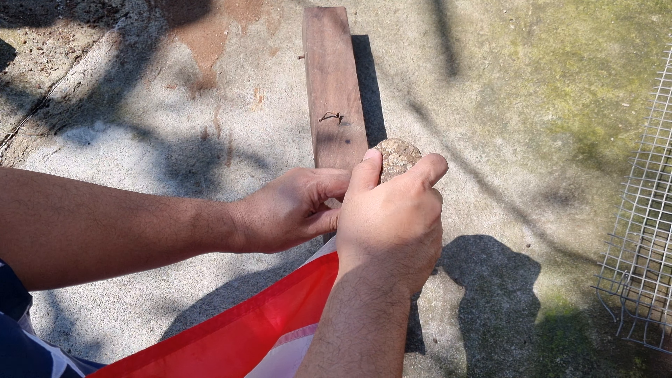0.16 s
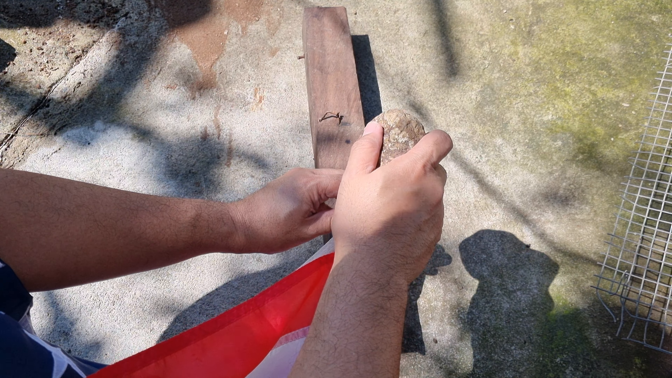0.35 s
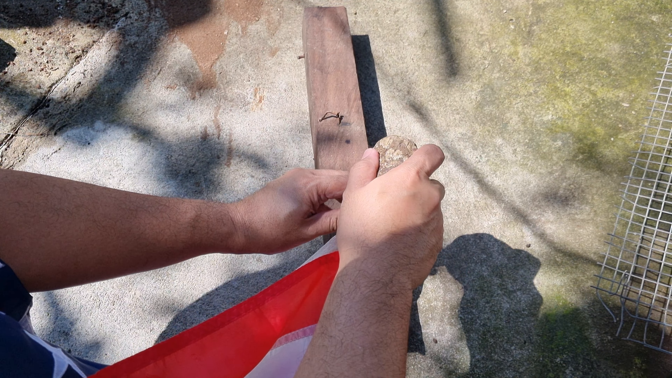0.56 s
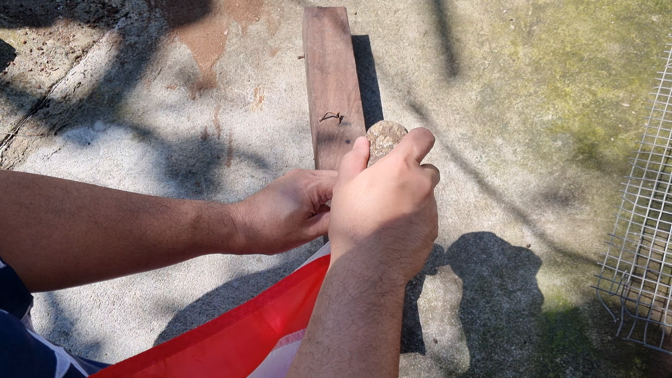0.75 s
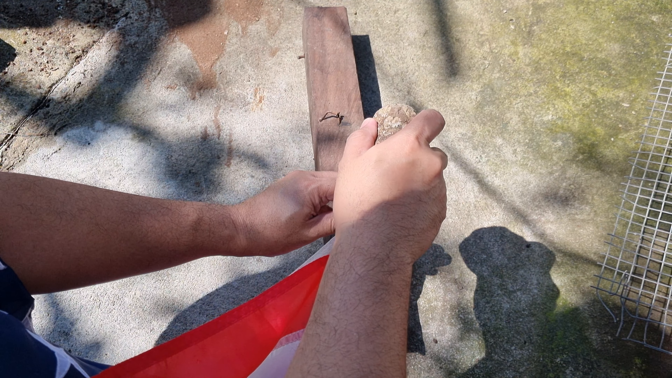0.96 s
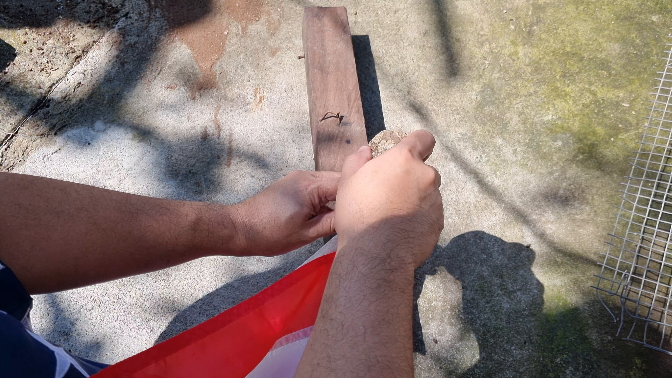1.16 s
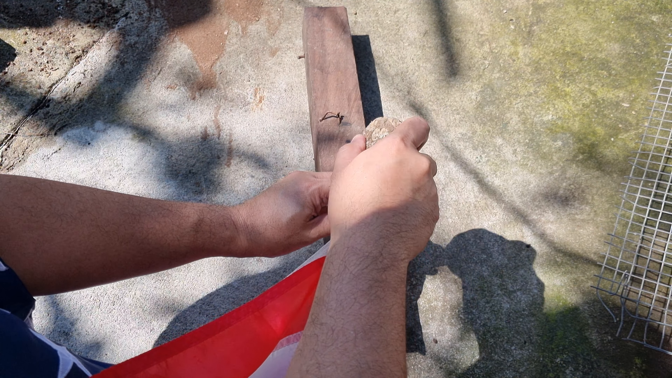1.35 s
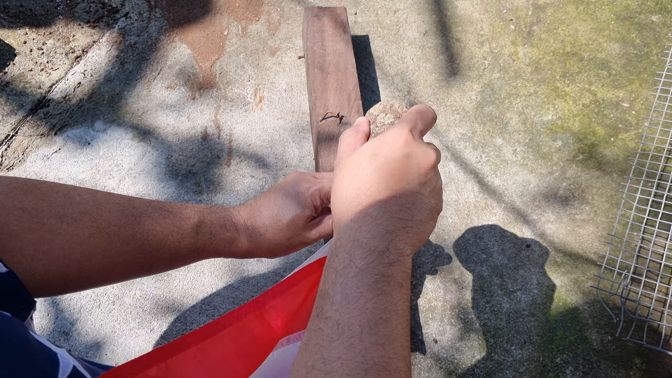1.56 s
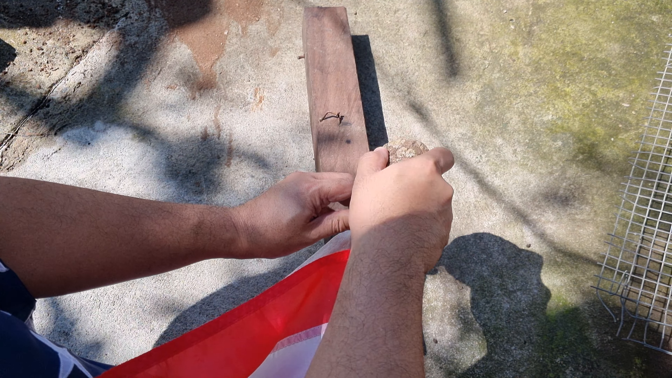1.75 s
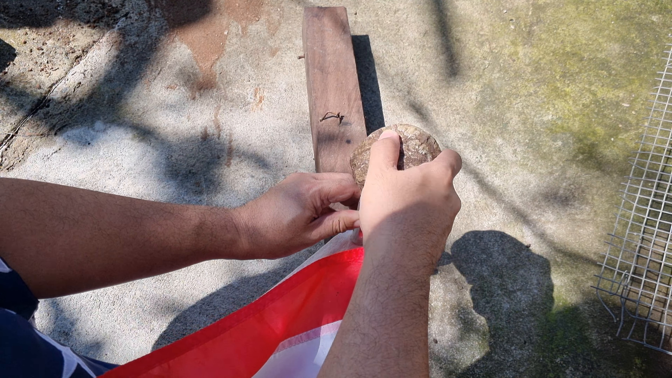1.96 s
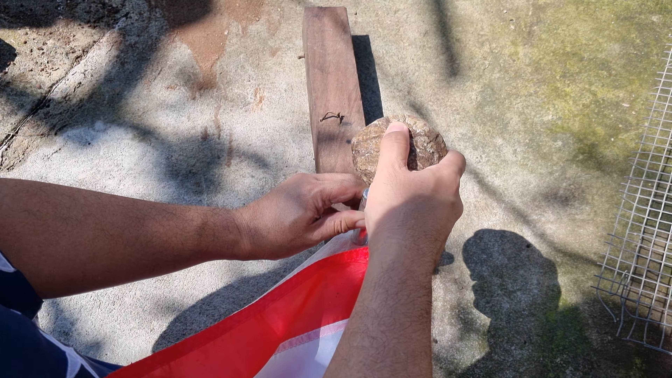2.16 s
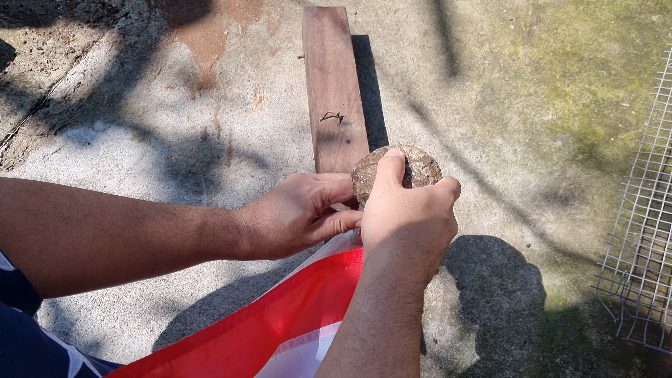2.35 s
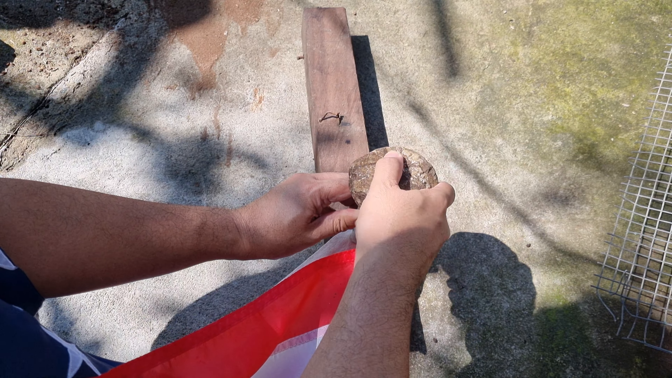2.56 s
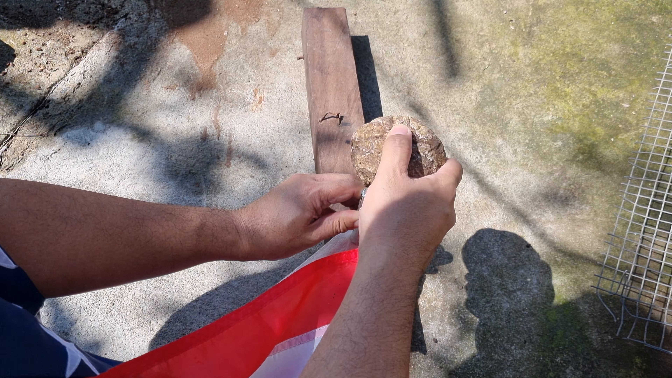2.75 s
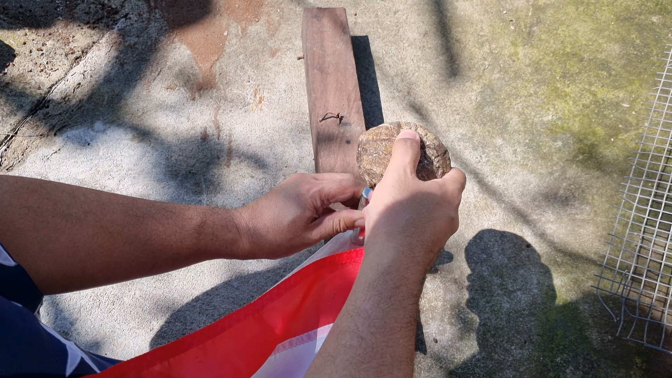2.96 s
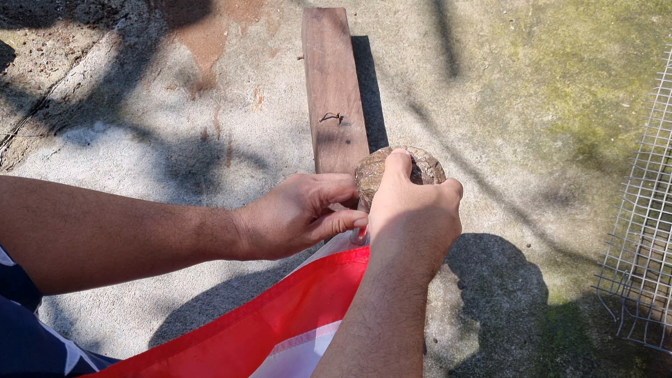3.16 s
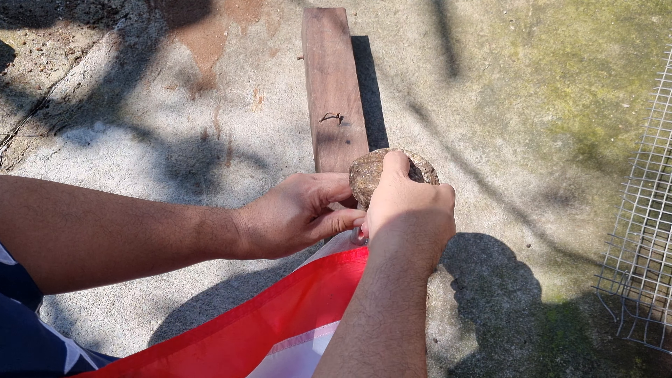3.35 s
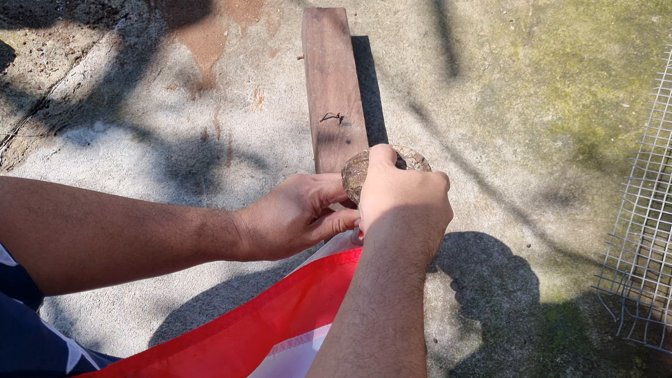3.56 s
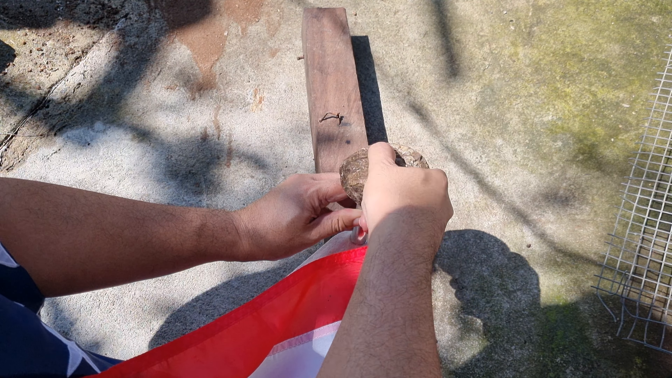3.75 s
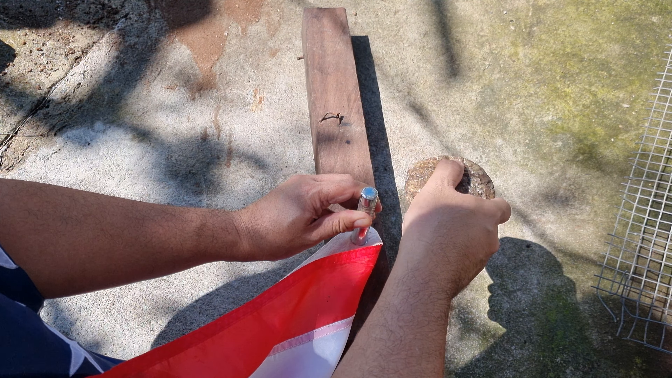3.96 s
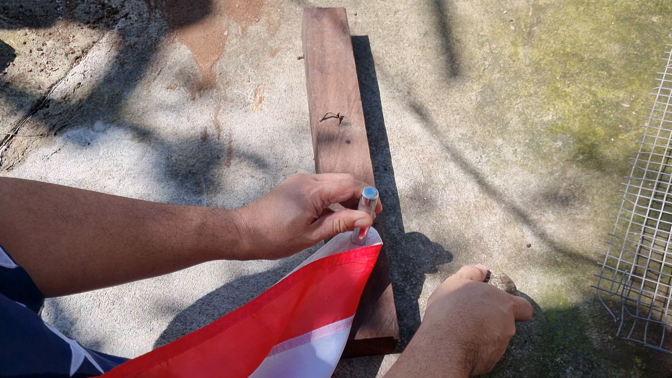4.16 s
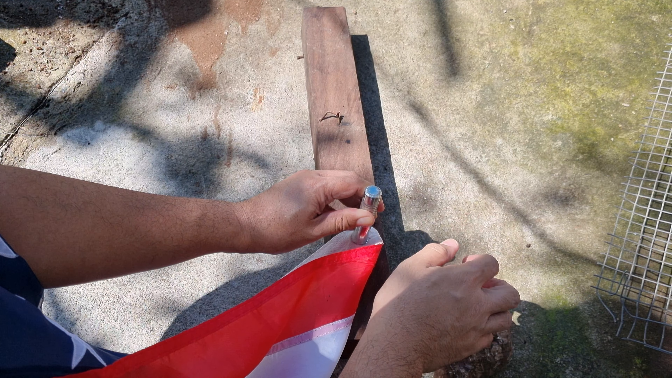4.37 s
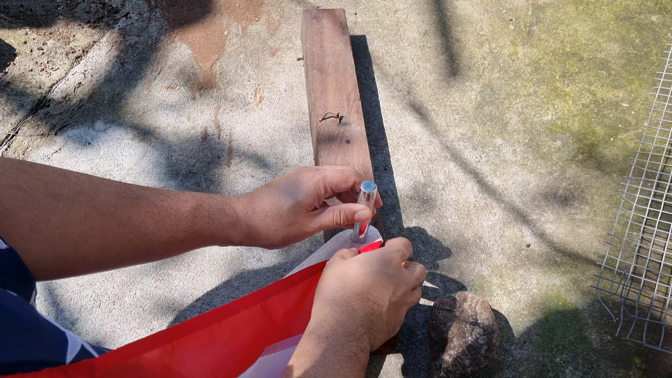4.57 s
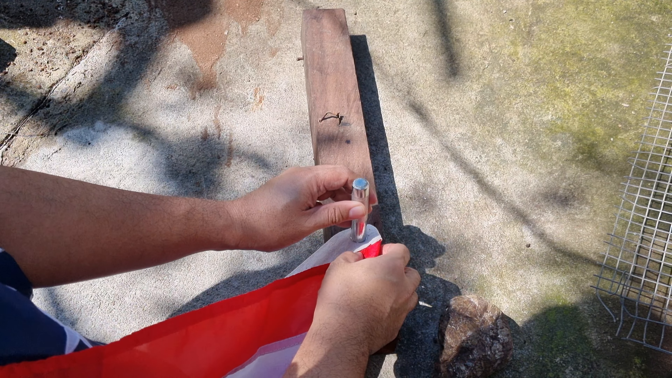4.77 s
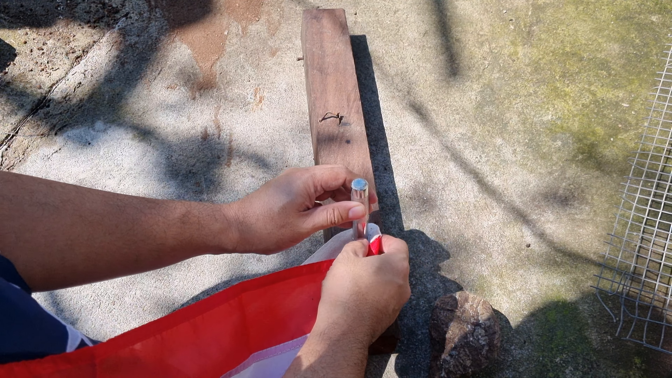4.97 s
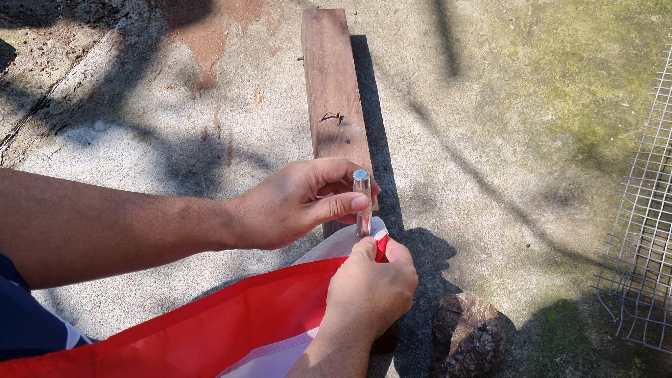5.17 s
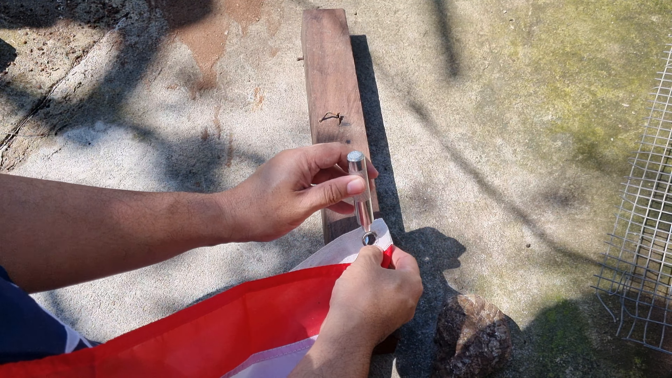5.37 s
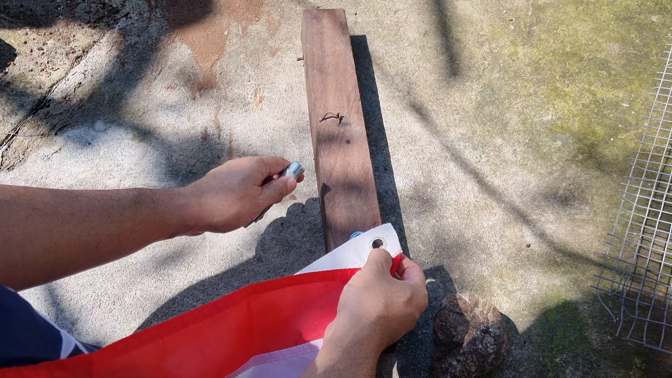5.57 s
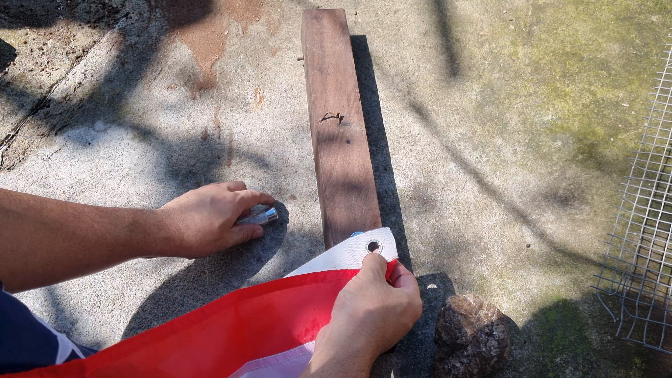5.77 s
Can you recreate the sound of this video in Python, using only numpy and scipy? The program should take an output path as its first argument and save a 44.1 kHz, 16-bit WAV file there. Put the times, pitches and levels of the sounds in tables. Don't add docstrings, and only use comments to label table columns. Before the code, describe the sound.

A hand-held stone strikes a steel punch in fourteen sharp, ringing clinks over a wooden thump, then tools are set down on concrete.

```python
import sys
import numpy as np
from scipy import signal
from scipy.io import wavfile

SR = 44100
rng = np.random.default_rng(int(sys.argv[2]) if len(sys.argv) > 2 else 0)


def undo_db(level):
    steps = np.asarray(level, float) / 20
    return 10 ** steps


def generate_wav(signal):
    frames = np.transpose(np.atleast_2d(signal))
    scaled = np.clip(frames, -1, 1) * 32767
    pcm = np.round(scaled).astype(np.int16)
    wavfile.write(sys.argv[1], SR, pcm)


N = 256566


def at_hz(points, hz, column=1):
    points = np.array(points)
    return np.interp(np.log(hz), np.log(points[:, 0]), points[:, column])


def rms_one(x):
    return x / np.sqrt(np.mean(x ** 2) + 1e-20)


def band_pass(x, low_hz, high_hz, order):
    return signal.sosfilt(signal.butter(order, [low_hz, high_hz], "band", fs=SR, output="sos"), x)


def high_pass(x, hz, order):
    return signal.sosfilt(signal.butter(order, hz, "high", fs=SR, output="sos"), x)


def low_pass(x, hz, order):
    return signal.sosfilt(signal.butter(order, hz, fs=SR, output="sos"), x)


def bands(size, gain_of_band, likeness):
    out = 0
    edges = 25 * 2 ** np.arange(0, 9.5, .4)
    white = rng.standard_normal((2, 2, size))
    for k, (low, high) in enumerate(zip(edges, edges[1:])):
        mid, side = band_pass(white[k % 2], low, high, order=3)
        hz = np.sqrt(low * high)
        alike = np.clip(at_hz(likeness, hz), 0, 1)
        stereo = np.sqrt(1 + alike) * mid + np.sqrt(1 - alike) * side * [[1], [-1]]
        out = out + gain_of_band(hz) * stereo
    return out


def narrow(hz, width_hz):
    r = np.exp(-np.pi * width_hz / SR)
    slow = signal.lfilter([1], [1, -r], rng.standard_normal(N) + 1j * rng.standard_normal(N))
    turns = np.cumsum(hz + np.zeros(N)) / SR
    return rms_one(np.real((2.6 + slow / np.std(slow)) * np.exp(2j * np.pi * turns)))


def modes(table, push_s, spread_db, apart=0., length_s=.2):
    t = np.arange(int(length_s * SR)) / SR
    hz, db, t60 = np.transpose(table)[:, :, None]
    strength, detune, phase = rng.standard_normal((3, len(table), 1))
    uneven_db = np.clip(spread_db, 0, 3.5) * np.clip(strength, -1.5, 1.5)
    decay = undo_db(db + uneven_db - 60 * np.maximum(t - push_s, 0) / t60)
    angle = 2 * np.pi * hz * (1 + 0.0042 * detune) * t
    ears = [decay * np.sin(angle + side * apart * phase) for side in (1, -1)]
    swell = np.sin(np.pi / 2 * np.minimum(t / push_s, 1)) ** 1.6
    return np.sum(ears, axis=1) * swell


def burst(low_hz, high_hz, t60, apart=0.8, length_s=0.1):
    t = np.arange(int(length_s * SR)) / SR
    mid, side = band_pass(rng.standard_normal((2, len(t))), low_hz, high_hz, order=4)
    return 0.51 * rms_one(mid + apart * side * [[1], [-1]]) * undo_db(-60 * t / t60)


def add(track, s, sound, pan_db=0.):
    at = round(s * SR)
    part = sound[:, :N - at]
    track[:, at:at + part.shape[1]] += undo_db(np.array([[pan_db / 2], [-pan_db / 2]])) * part


# (time [s], level [dB])
TRAFFIC_LEVEL = [
    (0, -38.5),
    (.7, -40.5),
    (2.2, -46),
    (3, -49.5),
    (4.1, -48.5),
    (4.95, -44.5),
    (5.4, -46),
    (5.65, -41),
    (5.82, -39),
]
# (frequency [Hz], level [dB per Hz])
TRAFFIC_RUMBLE = [(30, -26), (42, 6), (60, -7), (82, -16.5), (115, 1), (160, -5), (230, -8.5), (330, -16),
                  (460, -28), (620, -27.5), (800, -39), (1000, -52.5)]
# (frequency [Hz], level [dB per Hz])
TRAFFIC_HISS = [(700, -11), (1000, -6), (1700, -7), (3100, -11.5), (3700, -26), (5000, -40), (7000, -64),
                (16000, -81.5)]
# (frequency [Hz], level [dB per Hz])
MICROPHONE_NOISE = [(3000, -116), (7800, -118), (8700, -100), (11000, -106), (16000, -103)]
# (frequency [Hz], likeness [0 to 1])
TRAFFIC_LIKENESS = [(30, 1), (300, 0.69), (1000, 0.4), (4000, 0.1), (15000, .05)]


def traffic():
    s, db = np.transpose(TRAFFIC_LEVEL)
    rumble_db = np.interp(np.arange(N) / SR, s, db)
    hiss_db = -2 + 1.595 * rumble_db

    def gain(hz):
        if hz < 950:
            return undo_db(at_hz(TRAFFIC_RUMBLE, hz) + rumble_db + 19.5)
        hiss = undo_db(at_hz(TRAFFIC_HISS, hz) + hiss_db + 10.5)
        return hiss + undo_db(at_hz(MICROPHONE_NOISE, hz) + 1.0)
    return high_pass(bands(N, gain, TRAFFIC_LIKENESS), 36, order=6)


# (frequency [Hz], width [Hz], level [dB])
MACHINE_TONES = [(57, 1, -49), (116.7, 1.7, -54), (166.6, 8, -55.5), (551, 14, -73)]


def machine_hum():
    return sum(undo_db(db) * narrow(hz, width_hz) for hz, width_hz, db in MACHINE_TONES)


def whine_line(s, first_hz, last_hz, peak_db, steady_db):
    glide_s, swell_s, settle_s = .45, 0.066, 0.17
    gone_s, fade_db_per_s, overtone_db = 1.2, 68, -7.5
    t = np.arange(N) / SR
    since = t - s
    after = np.maximum(since, 0)
    level_db = steady_db + (peak_db - steady_db) * np.exp(-after / settle_s)
    level_db = level_db - fade_db_per_s * np.maximum(t - gone_s, 0)
    swell = np.clip(1 + since / swell_s, 0, 1) ** 2
    hz = last_hz + (first_hz - last_hz) * np.exp(-after / glide_s)
    tone = narrow(hz, width_hz=25) + undo_db(overtone_db) * narrow(2 * hz, width_hz=45)
    return swell * undo_db(level_db) * tone


# (time of swell [s], first pitch [Hz], last pitch [Hz], peak [dB], steady level [dB])
WHINE_LINES = [
    (.08, 1655, 1490, -65.5, -77.5),
    (.44, 1158, 1068, -67.5, -82.5),
]


def passing_whine():
    return sum(whine_line(*row) for row in WHINE_LINES)


# (frequency [Hz], level [dB], time to fall 60 dB [s])
YARD_TAIL = [(100, -15, .25), (586, -15.5, .18), (1890, -20, 0.15), (2500, -22.5, 0.24), (3040, -13, 0.18),
             (4900, -7.5, 0.16), (9500, -7, 0.13), (14980, -9.5, 0.073)]
# (frequency [Hz], likeness [0 to 1])
YARD_TAIL_LIKENESS = [(100, 0.89), (400, .9), (700, 0.24), (1900, .3), (4000, 0.069), (15000, .02)]
# (delay [s], level [dB])
WALL_ECHOES = [
    (0.019, -15.5),
    (.052, -27.5),
    (0.068, -36),
    (0.121, -47),
]


def yard(x):
    t = np.arange(int(.35 * SR)) / SR

    def gain(hz):
        return undo_db(at_hz(YARD_TAIL, hz) - 60 * t / at_hz(YARD_TAIL, hz, column=2))
    tail = bands(len(t), gain, YARD_TAIL_LIKENESS)
    tail *= 0.046 * np.minimum(t / 0.0017, 1)
    for delay_s, db in WALL_ECHOES:
        for ear, later_s in zip(tail, rng.uniform(0, 0.0005, 2)):
            ear[int((delay_s + later_s) * SR)] += undo_db(db - 4.5)
    return signal.fftconvolve(x, tail, axes=1)[:, :N]


# (time [s], peak [dB], dying away [dB per s])
CLOTH_PULLS = [
    (4.335, -70, 470),
    (5.22, -58, 700),
    (5.555, -69, 600),
    (5.83, -77, 502),
]


def cloth():
    t = np.arange(N) / SR
    level = 0
    for s, db, fall_db_per_s in CLOTH_PULLS:
        level = level + undo_db(db - np.where(t < s, 1100 * (s - t), fall_db_per_s * (t - s)))
    jerks = np.repeat(rng.exponential(1, N // 40 + 1), 40)[:N] ** 0.84
    grit = rng.standard_normal((2, N)) * jerks
    low = band_pass(grit, 5800, 7300, order=2)
    high = band_pass(grit, 8800, 16000, order=2)
    return level * rms_one(low + .3 * high)


# (time [s], level [dB], time to fall 60 dB [s])
PUNCH_NUDGES = [
    (4.4213, -43, 0.027),
    (4.649, -46.5, 0.089),
    (4.7455, -47, 0.065),
    (4.761, -48, 0.063),
    (4.771, -49.5, 0.11),
    (4.9873, -27, 0.053),
    (5.1148, -48.5, 0.094),
    (5.149, -50.5, .08),
]


def punch_nudges(track):
    for s, db, t60 in PUNCH_NUDGES:
        ring = [(1846, -1, t60), (1815, -34.0, t60 * 0.55), (2030, -8, t60 * 0.59), (2980, -17.0, t60 * 0.25)]
        add(track, s, undo_db(db - 5.5) * modes(ring, push_s=0.0025, spread_db=0, apart=0.12), pan_db=2.5)


# (time [s], dull level [dB], hard edge [dB], time to fall 60 dB [s])
TOUCHDOWNS = [(4.2139, -18.5, -58, 0.037), (4.245, -41.5, -64, 0.043), (4.324, -25.5, -48.5, 0.037),
              (4.347, -43, -61, 0.14), (4.507, -56.5, -83.5, 0.042), (4.561, -41, -65, 0.064),
              (4.585, -42, -69, 0.024), (4.657, -43, -72, 0.085), (4.669, -64, -61, 0.036),
              (4.761, -54, -61, 0.1), (4.819, -41, -64, 0.048), (4.881, -46.5, -61, 0.053),
              (4.9873, -46.5, -58, 0.078), (5.118, -46, -71, 0.052), (5.549, -48.5, -57, 0.13),
              (5.69, -54, -63, 0.15), (5.7977, -24.5, -48.5, 0.027), (5.808, -27, -53, 0.058)]


def touchdowns(track):
    for s, dull_db, edge_db, t60 in TOUCHDOWNS:
        body = undo_db(dull_db - 2.5) * burst(130, 525, t60 * 2.0, apart=0.047)
        body = body + undo_db(dull_db - 1.0) * burst(500, 1600, t60 * 0.55)
        edge = undo_db(edge_db - 4.0) * burst(740, 3400, t60 * 2.0)
        bright = undo_db(edge_db - 21) * burst(9100, 10500, t60 * 1.4, apart=0.6)
        tick = undo_db(edge_db + 7.5) * burst(600, 3300, .011, apart=.2)
        add(track, s, body + edge + bright + tick, pan_db=3.0)


# (time [s], frequency [Hz], level [dB], time to fall 60 dB [s])
PUNCH_LANDINGS = [
    (4.3246, 9150, -56.5, 0.02),
    (5.8011, 9680, -41, 0.45),
]


def punch_landings(track):
    for s, hz, db, t60 in PUNCH_LANDINGS:
        add(track, s, modes([(hz, db, t60)], push_s=.0012, spread_db=0), pan_db=7.0)


def handling():
    out = np.zeros((2, N))
    punch_nudges(out)
    touchdowns(out)
    punch_landings(out)
    return out


# (frequency [Hz], level [dB], time to fall 60 dB [s])
PLANK_LOW_TONES = [(73, -12.5, 0.033), (133.4, -4.5, 0.19), (186, -12.5, 0.15)]
# (frequency [Hz], level [dB], time to fall 60 dB [s])
PLANK_HIGH_TONES = [(260.6, -0.5, 0.062), (322, -3.5, .045), (432.5, -8, .04)]


def plank_thump(track, s, thump_db):
    low = modes(PLANK_LOW_TONES, push_s=0.012, spread_db=1.5, apart=.08)
    high = modes(PLANK_HIGH_TONES, push_s=0.019, spread_db=3.5, apart=0.16)
    add(track, s + 0.00033, undo_db(thump_db - 2.0) * low)
    add(track, s + 0.00051, undo_db(0.66 * thump_db - 15.5) * high)
    add(track, s + 0.0034, undo_db(0.37 * thump_db - 17.5) * burst(200, 890, 0.08, apart=0.23))


# (frequency [Hz], level [dB], time to fall 60 dB [s])
STONE_TONES = [(586, -9.5, 0.041), (754, -9.5, 0.0085), (845, -5, 0.015), (1168, -2.5, 0.0035),
               (1362, 1, 0.0076), (2155, -2.5, 0.013), (2727, -3.5, .006), (2950, -9, .005)]


def stone_knock(track, s, knock_db, bottom_s):
    knock = modes(STONE_TONES, 0.52 * bottom_s, spread_db=1.5, apart=0.76)
    add(track, s, undo_db(knock_db + 5.0) * knock, pan_db=3.45)
    add(track, s, undo_db(knock_db - 13.0) * burst(610, 2900, 0.17, apart=0.15))


# (frequency [Hz], level [dB], time to fall 60 dB [s])
PUNCH_UPPER_TONES = [(3086, -11.5, 0.078), (3203, -10, 0.044), (3410, -14, 0.018), (3740, -18.5, 0.02),
                     (4370, -18.5, 0.059), (4390, -13.5, 0.061), (4520, -12.5, 0.023), (5740, -18, .03)]


def steel_crack(track, s, upper_db, bottom_s):
    crack_db = upper_db - 12.5 + 7 * np.exp(-abs(s - .5) / .45)
    top_wear_db = 1.5 * s
    tick = np.sin(2 * np.pi * np.arange(22) / 22) * np.linspace(1, .5, 22) * [[1], [1]]
    upper = modes(PUNCH_UPPER_TONES, 0.84 * bottom_s, spread_db=3.5, apart=.5)
    add(track, s, undo_db(0.78 * crack_db + 17.0) * tick)
    add(track, s, undo_db(upper_db + 2.0) * upper, pan_db=-1.5)
    add(track, s, undo_db(upper_db + 7.5) * burst(3500, 5200, 0.011, apart=.7), pan_db=-0.5)
    add(track, s, undo_db(crack_db + 5.5) * burst(4500, 7200, 0.013, apart=.6))
    add(track, s, undo_db(crack_db + 7.0) * burst(8500, 11200, .022, apart=1.2), pan_db=1.0)
    add(track, s, undo_db(crack_db - 1.0 - top_wear_db) * burst(12000, 15000, 0.041, apart=0.97))


# (frequency [Hz], level [dB], time to fall 60 dB [s])
PUNCH_TONES = [(1866.4, 1, 0.089), (1802, -13.5, .12), (1951, -14, 0.12), (2080, -14, 0.1),
               (1723, -28.5, 0.075)]
# (frequency [Hz], level [dB], time to fall 60 dB [s])
PUNCH_LINGERING = [(1842, -37.5, 0.2), (3166, -44.5, .2), (3050, -46, 0.23)]


def punch_ring(track, s, ring_db, bottom_s):
    grip_s, grip_db = .013, -11
    t = np.arange(int(.2 * SR)) / SR
    grip = undo_db(grip_db / (1 + np.exp(-(t - grip_s) / .001)))
    ring = grip * modes(PUNCH_TONES, bottom_s, spread_db=2.47, apart=0.076)
    linger = modes(PUNCH_LINGERING, bottom_s, spread_db=1.0, apart=0.9, length_s=.3)
    click = modes([(2150, 0.0031, 0.0056)], push_s=0.00073, spread_db=3.5)
    add(track, s + .0004, undo_db(ring_db - 7.0) * ring, pan_db=-0.45)
    add(track, s, undo_db(ring_db) * linger)
    add(track, s + bottom_s - .0009, undo_db(ring_db - 3.5) * click)


# (time [s], ring [dB], thump into the plank [dB], sharpness of steel contact [dB])
STONE_BLOWS = [(0.1487, -17.5, -41, -53), (0.4915, 0.5, -22, -20), (0.791, -1.5, -16, -18),
               (1.0944, -3.5, -18, -22), (1.3818, -14, -11.5, -37.5), (1.6845, -2.5, -15.5, -21.5),
               (1.9846, -1, -21.5, -19), (2.2625, -0.5, -22, -21), (2.535, 0.5, -21, -19.5),
               (2.7977, -0.5, -22, -20), (3.0707, -1, -22.5, -20), (3.3171, 0.5, -22.5, -22.5),
               (3.5564, 0, -26, -22.5), (3.7392, -2.5, -24, -24.5)]


def blows():
    first_bottom_s, packed_bottom_s, packing_s = .0033, .0021, 1.1
    out = np.zeros((2, N))
    for s, ring_db, thump_db, upper_db in STONE_BLOWS:
        bottom_s = packed_bottom_s + (first_bottom_s - packed_bottom_s) * np.exp(-s / packing_s)
        knock_db = -6.5 + 0.57 * thump_db - .05 * ring_db
        plank_thump(out, s, thump_db)
        stone_knock(out, s, knock_db, bottom_s)
        steel_crack(out, s, upper_db, bottom_s)
        punch_ring(out, s, ring_db, bottom_s)
    return out


def scene():
    background = traffic() + machine_hum() + passing_whine()
    near = blows() + handling()
    return background + cloth() + near + yard(near)


def roll_off(x):
    return signal.sosfilt(signal.butter(12, 16480, fs=SR, output="sos"), x)


def record(dry):
    smear_db, smear_s = -26, .026
    size = int(smear_s * SR)
    ahead = rms_one(rng.standard_normal((2, size)) * np.linspace(.15, 1, size)) / np.sqrt(size)
    treble = high_pass(dry, 7000, order=1)
    smear = undo_db(smear_db) * signal.oaconvolve(treble, ahead, axes=1)[:, size - 1:]
    capsule = low_pass(dry + smear, 13500, order=3)
    over = capsule - np.clip(capsule, -.75, .75)
    limited = capsule - over + .21 * np.tanh(over / .21)
    finished = signal.sosfilt(signal.cheby2(8, 50, 16900, fs=SR, output="sos"), limited)
    return roll_off(finished)


dry = scene()
out = record(dry)
generate_wav(out)
```